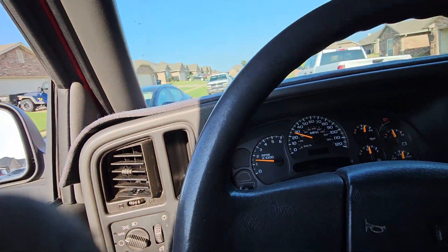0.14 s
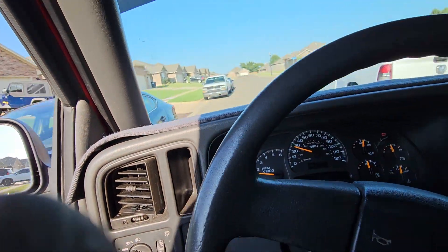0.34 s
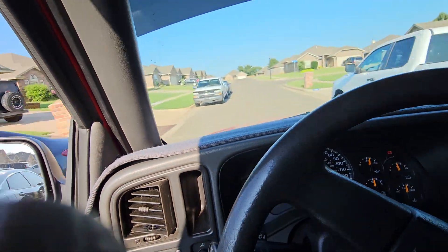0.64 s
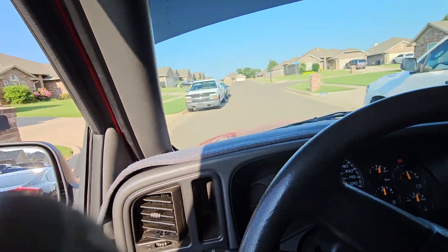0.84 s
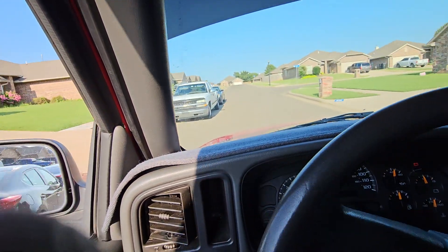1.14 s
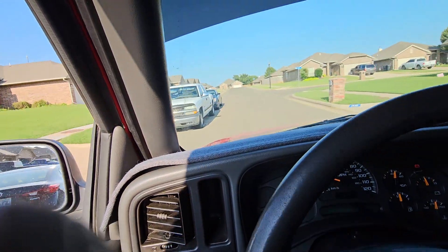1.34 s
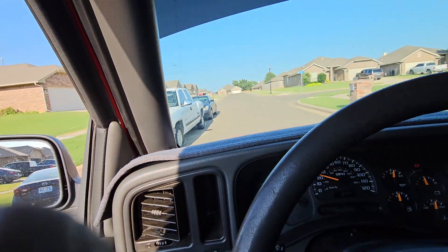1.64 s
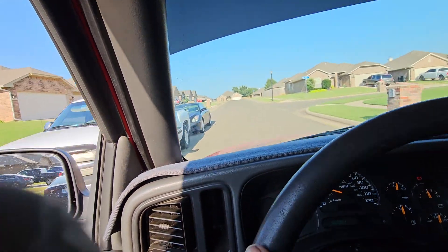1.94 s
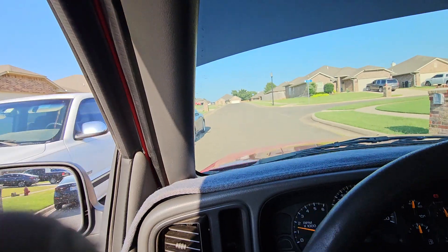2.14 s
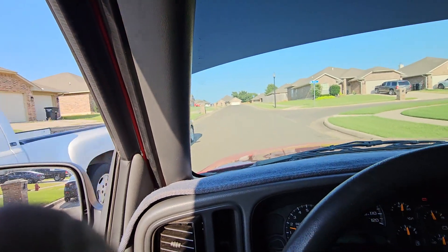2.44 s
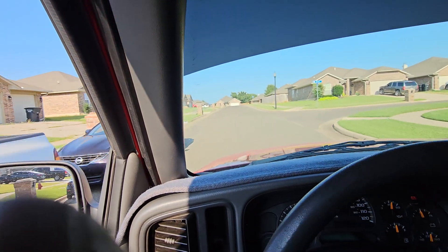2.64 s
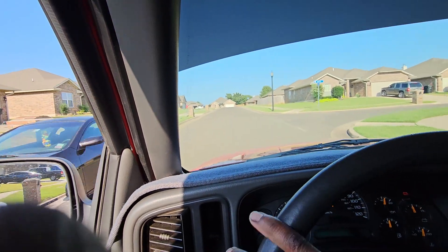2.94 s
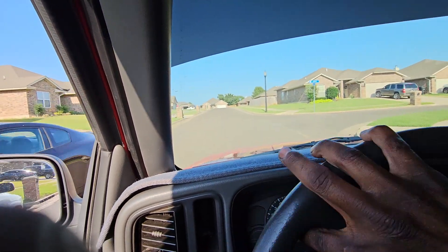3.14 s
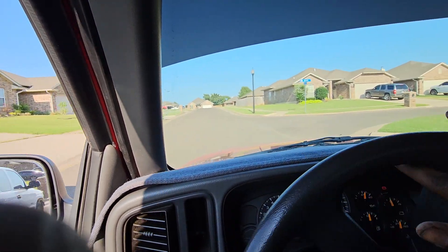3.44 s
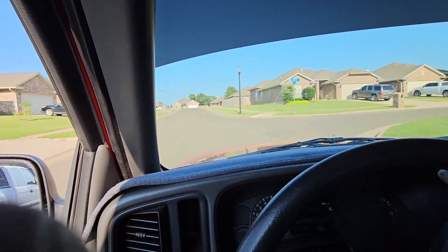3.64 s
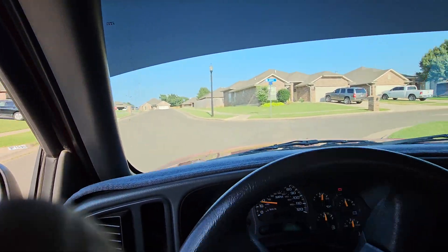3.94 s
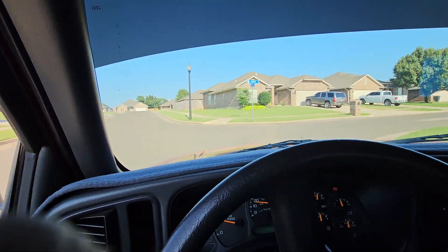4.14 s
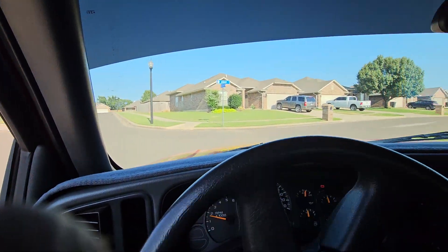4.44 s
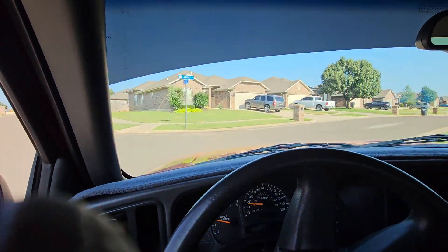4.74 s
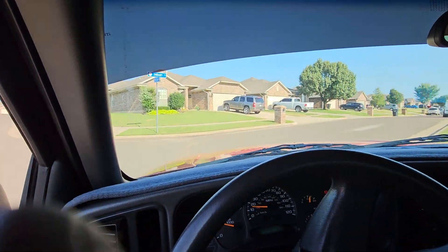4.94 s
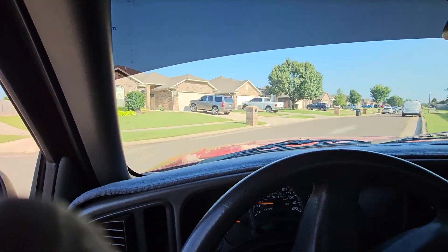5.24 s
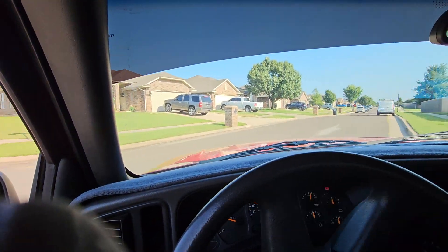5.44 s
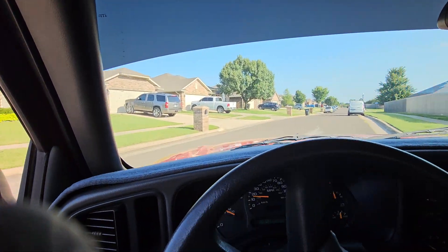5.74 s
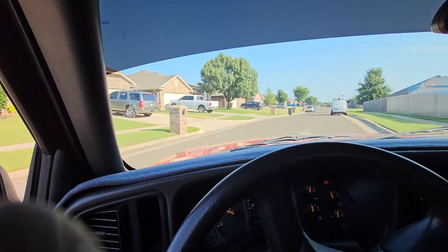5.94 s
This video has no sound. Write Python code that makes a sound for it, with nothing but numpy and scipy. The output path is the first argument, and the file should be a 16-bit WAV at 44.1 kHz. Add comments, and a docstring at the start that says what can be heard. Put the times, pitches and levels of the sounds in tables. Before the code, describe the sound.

A rough V8 pickup rumbles along slowly, heard inside the cab with wind buffeting and trim rattling, then revs up.

```python
"""A V8 pickup rolls along a street and revs up at the end, heard in the cab with the driver's window down.
The engine's firings make the exhaust drone and burble, and one bank (row of cylinders) leaks in chuffs.
Chuffs, tyre swish and engine roar grow louder where parked cars throw them back. Gusts buffet the cab,
intake air hisses, something squeaks faintly, loose trim rattles on bumps and a hand slides on the wheel."""
import sys
import numpy as np
from scipy import signal
from scipy.fft import rfft, irfft
from scipy.io import wavfile
from scipy.ndimage import uniform_filter1d

SR = 44100
rng = np.random.default_rng(int(sys.argv[2]) if len(sys.argv) > 2 else 0)


def generate_wav(sig):
    """Save sig (samples, or channels by samples) to the path in sys.argv[1] as 16-bit PCM at SR."""
    pcm = np.round(np.clip(np.atleast_2d(sig).T, -1, 1) * 32767).astype(np.int16)
    wavfile.write(sys.argv[1], SR, pcm)


N = 269010
TIME = np.arange(N) / SR
FREQS = np.fft.rfftfreq(N, 1 / SR)

# engine speed (time [s], firings per second [Hz])
FIRING_RATE = [(0.0, 75.7), (0.36, 74.5), (0.64, 71.2), (0.9, 71.9), (1.2, 76.9), (1.6, 76.6), (1.92, 74.8),
               (2.68, 84.4), (3.16, 79.9), (3.42, 75.0), (3.96, 81.5), (4.2, 86.1), (4.42, 85.0),
               (4.98, 86.1), (5.72, 119.4), (6.1, 122.1)]
# how much louder the window side is (frequency [Hz], left minus right [dB])
WINDOW_SIDE = [(50, 1), (80, -0.3), (125, 1.5), (300, 2.5), (700, 3.5), (1300, 5), (2500, 6), (4500, 10.5),
               (7500, 10), (9500, 9), (12000, 2), (15000, 15.5)]
# knocks of trim and body over bumps (time [s], level [dB], hardness as extra treble [dB])
BUMP_KNOCKS = [(.247, -36, -24), (.563, -36, -13), (2.705, -35.5, -13), (3.371, -36, -12),
               (3.407, -29, -19), (3.448, -36, -17), (3.482, -37, -12), (3.826, -39.5, 2),
               (3.851, -40.5, -6), (3.891, -32, -9), (3.99, -37, -17), (4.014, -35, 1.5), (4.023, -38, -11),
               (4.073, -30, 7), (4.123, -30, -5), (4.155, -33.5, 7.5), (4.168, -37, 0), (4.202, -51.5, 10),
               (4.255, -34, -4.5), (4.284, -47, 15), (4.757, -58, 16)]


def amp(db):
    """Turns decibels into a gain to multiply by."""
    return 10 ** (np.asarray(db) / 20)


def unit_level(x):
    """Scales a signal to an average (rms) level of 1."""
    return x / np.sqrt(np.mean(x ** 2) + 1e-20)


def over_time(rows):
    """Joins (time, value) points into one value per sample."""
    return np.interp(TIME, *np.transpose(rows))


def over_freqs(rows):
    """Joins (frequency, value) points along a logarithmic frequency axis."""
    hz, value = np.transpose(rows)
    return np.interp(np.log(FREQS + 1), np.log(hz + 1), value)


def noise():
    """Two channels of white noise."""
    return rng.standard_normal((2, N))


def colour(x, spectrum):
    """Filters a signal by a (frequency, dB) table and scales it to level 1."""
    return unit_level(irfft(rfft(x) * amp(over_freqs(spectrum)), N))


def wander(rate_hz):
    """A smooth random wobble of level 1, mostly slower than rate_hz."""
    hz = FREQS[FREQS < 3 * rate_hz]
    slow_part = rfft(rng.standard_normal(N))[:len(hz)]
    return unit_level(irfft(slow_part * np.exp(-(hz / rate_hz) ** 2), N))


def add(mix, start_s, sound):
    """Mixes a sound in at its start time."""
    part = mix[:, round(start_s * SR):][:, :sound.shape[1]]
    part += sound[:, :part.shape[1]]


def swells(rows, floor_db=-120):
    """A gain that rises in bell-shaped swells above a floor; their powers add."""
    t = TIME[::32]
    power = sum(amp(db) ** 2 * np.exp(-((t - peak_s) / half_s) ** 2) for peak_s, db, half_s in rows)
    return np.sqrt(amp(floor_db) ** 2 + np.interp(TIME, t, power))


def revs():
    """Engine speed in octaves (doublings) above its starting speed."""
    return np.log2(over_time(FIRING_RATE) / FIRING_RATE[0][1])


def throttle(smooth_s=0.41):
    """How fast the revs climb, in octaves per second; zero when coasting."""
    climb = np.maximum(np.gradient(revs()) * SR, 0)
    return uniform_filter1d(climb, round(smooth_s * SR))


def in_cab(two_noises, spectrum):
    """Filters two noises into cab sound: bass alike in both ears, treble spread out and from the left."""
    # how alike the two ears hear it (frequency [Hz], likeness [0 to 1])
    likeness = [(60, 1), (100, 0.99), (140, 1), (290, 0.88), (640, 0.51), (1400, 0.77), (3000, 0.086),
                (8000, 0.14)]
    first, second = rfft(two_noises) * amp(over_freqs(spectrum))
    alike = np.clip(over_freqs(likeness), -1, 1)
    mid, side = first * np.sqrt(1 + alike), second * np.sqrt(1 - alike)
    lean = amp(over_freqs(WINDOW_SIDE) / 2)
    pair = irfft(np.array([(mid + side) * lean, (mid - side) / lean]), N)
    return pair / np.std(pair.mean(0))


def exhaust_drone(firings, firing_waver_db=1.0, other_waver_db=2.0, slip_radians=0.15):
    """Engine tones sweep through the cab's resonances; uneven cylinder banks give the odd ones."""
    # exhaust tones (multiple of the eight-firing cycle [count], relative level [dB])
    tones = [(3, -12.5), (5, -16), (7, -16), (8, 1.5), (10, -12.5), (11, -9.5), (13, -12.5), (16, -9),
             (19, -15), (21, -18.5), (24, -19), (27, -21.5), (29, -19.5), (32, -36), (37, -25.5)]
    # how the cab passes them, booming near 200 Hz (frequency [Hz], gain [dB])
    cab_response = [(40, 6.5), (72, 0.5), (80, 0.5), (125, 2.5), (150, 1), (168, 1.5), (184, -4), (197, 9),
                    (207, -2), (240, -7), (285, -4), (350, -4.5), (480, -16), (560, 2), (650, -12)]
    # loudness of the whole drone (time [s], level [dB])
    loudness = [(0.3, -24.6), (1.0, -26.5), (2.2, -27), (4.2, -26.5), (5.3, -28.5), (5.9, -24)]
    dip_hz, dip_width_hz, dip_db = 95, 6.1, -2  # the driver sits in a quiet spot for this pitch
    cab_db = over_freqs(cab_response) + dip_db * np.exp(-((FREQS - dip_hz) / dip_width_hz) ** 2)
    cycle_hz = over_time(FIRING_RATE) / 8
    out = np.zeros(N)
    for multiple, db in tones:
        is_firing_tone = multiple == 8
        turns = multiple * firings / 8 + (0 if is_firing_tone else rng.random())
        waver_db = wander(5.7) * (firing_waver_db if is_firing_tone else other_waver_db)
        gain = amp(db + np.interp(multiple * cycle_hz, FREQS, cab_db) + waver_db)
        slip = 0 if is_firing_tone else slip_radians * wander(9.8)
        out += gain * np.cos(2 * np.pi * turns + slip)
    lean = amp(over_freqs(WINDOW_SIDE) / 2)
    pair = irfft(rfft(unit_level(out)) * np.array([lean, 1 / lean]), N)
    return pair * amp(over_time(loudness))


def exhaust_burble(firings, firing_hz, boost_db=7.5, steady=0.46, rise_s=0.0012, decay_s=0.0067):
    """Each firing blows a ragged puff down the pipe."""
    # rumble of uneven burning (frequency [Hz], relative level [dB])
    spectrum = [(30, -35), (60, 9), (110, -2.5), (150, -2.5), (200, 0.5), (280, -4), (340, -15.5),
                (450, -20), (700, -19), (1500, -53)]
    # swells under load (peak time [s], level before the boost [dB], half-length [s])
    surges = [(0.28, -43, 0.11), (0.65, -47.5, 0.26), (2.8, -42.5, 0.34), (3.7, -45, 0.3),
              (4.72, -37, 0.054), (5.21, -38, 0.03)]
    since_firing_s = firings % 1 / firing_hz
    puffs = steady + (1 - np.exp(-since_firing_s / rise_s)) * np.exp(-since_firing_s / decay_s)
    gain = swells(surges, floor_db=-43.5 + 1.5 * revs()) * amp(boost_db)
    return in_cab(noise() * puffs, spectrum) * gain


def air_buffet(evening_out=0.38, breeze_db=-27.5):
    """Gusts at the open window and jolts from the road pump the air of the whole cab."""
    # the deep flutter of the air (frequency [Hz], relative level [dB])
    spectrum = [(8, -54), (18, -7), (23, -2.5), (29, 5.5), (42, -6), (52, -6), (70, -21.5), (130, -25.5),
                (400, -75)]
    # gusts and jolts (peak time [s], level [dB], half-length [s])
    gusts = [(0.08, -21.5, 0.049), (0.3, -11.5, 0.019), (0.43, -17.5, 0.093), (0.57, -14.5, 0.022),
             (0.74, -18.5, 0.057), (1.15, -28.5, 0.18), (1.48, -21, 0.05), (2.89, -22.5, 0.097),
             (3.39, -13.5, 0.041), (3.55, -20, 0.046), (3.74, -24.5, 0.066), (4.0, -14.5, 0.068),
             (4.56, -32, 0.3), (4.84, -15.5, 0.028), (4.96, -15, 0.04), (5.17, -25, 0.067),
             (5.35, -21.5, 0.019)]
    swing = signal.hilbert(colour(rng.standard_normal(N), spectrum))
    swing_size = np.sqrt(uniform_filter1d(abs(swing) ** 2, size=2500))
    return unit_level(swing.real / swing_size ** evening_out) * swells(gusts, breeze_db)


def parked_car_gain(source, direct_db, lag_s=0, spread=1, falloff=1.28):
    """Gain of an outside sound: its direct part plus what each parked car throws back."""
    # parked cars (time alongside [s], half-length [s], chuff echo [dB], tyre echo [dB], engine echo [dB])
    parked_cars = [(0.1, 0.19, -47.5, -48, -42.5), (0.685, 0.18, -45, -44, -39),
                   (1.157, .15, -56.5, -51.5, -45.5), (2.533, 0.19, -46.5, -44, -44.5),
                   (2.88, 0.37, -52.5, -49, -48.5), (3.488, 0.17, -49.5, -46, -54),
                   (3.867, .12, -53.5, -57, -49)]
    column = ("chuffs", "tyres", "engine").index(source)
    t, power = TIME[::32], 0
    for alongside_s, half_s, *echo_db in parked_cars:
        distance = (t - lag_s - alongside_s) / (half_s * spread)
        power = power + amp(echo_db[column]) ** 2 / (1 + distance ** 2 / 2) ** (2 * falloff)
    return np.sqrt(amp(direct_db) ** 2 + np.interp(TIME, t, power))


def leak_chuffs(firings, idle_db=-66.5, rise_s=0.0024, decay_s=0.0095, steady=0.17, patchy_db=5.0):
    """One bank leaks gas in a limping rhythm, harder under throttle; each jet has its own hiss."""
    # the leaking cylinders (place in the eight-firing cycle [firings], relative level [dB])
    cylinders = [(0, 0), (1, -8), (3, -1), (6, -4)]
    # hiss of the escaping gas (frequency [Hz], relative level [dB])
    spectrum = [(500, -15.5), (1200, 9.5), (2500, -2), (4000, -13), (5300, 5), (6500, 1.5), (7500, -0.5),
                (8500, 2.5), (10300, 2), (11800, 6.5), (13000, -2), (14300, -7), (16000, -14)]
    start_place = 0.62  # where in the firing cycle the limping chuff rhythm starts [firings]
    t = np.arange(3072) / SR
    shape = (1 - np.exp(-t / rise_s)) * np.exp(-t / decay_s)
    jets = steady * noise()
    for place, db in cylinders:
        cycle = np.floor((firings - place + start_place) / 8)
        for start in np.flatnonzero(np.diff(cycle)):
            patches = unit_level(uniform_filter1d(rng.standard_normal(len(t) // 2 + 1), size=45))
            jet = irfft(rfft(rng.standard_normal((2, len(t)))) * amp(patchy_db * patches))
            add(jets, start / SR, unit_level(jet) * shape * amp(db))
    direct_db = idle_db + 10 * revs() + 5 * throttle()
    return in_cab(jets, spectrum) * parked_car_gain("chuffs", direct_db)


def tyre_swish(idle_db=-59, db_per_octave=6, flutter_db=1.0):
    """Tyres swish on the road, louder with speed and beside parked cars."""
    # the swish (frequency [Hz], relative level [dB])
    spectrum = [(500, -9), (1050, 0.5), (1400, 2), (1750, -1.5), (2250, 1), (3200, -5), (4800, -4.5),
                (6500, -15), (9000, -14), (11700, -37), (16000, -33)]
    swish = in_cab(noise() * amp(flutter_db * wander(27)), spectrum)
    return swish * parked_car_gain("tyres", idle_db + db_per_octave * revs(), lag_s=0.015, spread=0.94)


def engine_roar(firings, idle_db=-48, db_per_octave=3, throb=0.24):
    """The engine bay's roar throbs with the firings, louder with speed and beside parked cars."""
    # the roar (frequency [Hz], relative level [dB])
    spectrum = [(150, -47), (350, -1), (450, 0.5), (550, 4), (650, -2), (780, 1), (980, -4), (1250, -3.5),
                (1700, -10.5), (2200, -15.5), (3200, -24.5), (6000, -42), (16000, -57)]
    roar = in_cab(noise() * (1 + throb * np.cos(2 * np.pi * firings)), spectrum)
    return roar * parked_car_gain("engine", idle_db + db_per_octave * revs(), lag_s=0.015, spread=1.16)


def intake_hiss(idle_db=-66, db_per_octave=12):
    """Air drawn into the engine hisses more as the revs climb."""
    # the rushing air (frequency [Hz], relative level [dB])
    spectrum = [(1000, 0), (2500, 7.5), (5000, -3), (8000, -6), (10000, 0), (11700, 7), (14000, -2),
                (16000, -28)]
    return in_cab(noise(), spectrum) * amp(idle_db + db_per_octave * revs())


def squeaks(waver=0.022, right_db=-9):
    """Brief thin chirps of wavering pitch on the window side."""
    # the chirps (start [s], pitch [Hz], relative level [dB], length [s])
    chirps = [(0.16, 5320, -50, 0.05), (0.373, 5200, -57, 0.057), (0.666, 8300, -45, 0.036),
              (0.741, 6200, -53, .018), (2.204, 5200, -51.5, 0.028), (2.606, 5400, -51, .018),
              (4.011, 4580, -42.5, 0.012)]
    out = np.zeros((2, N))
    for start_s, hz, db, length_s in chirps:
        count = round(length_s * SR)
        turns = np.cumsum(hz * (1 + waver * wander(300)[:count])) / SR
        chirp = amp(db) * np.hanning(count) * np.sin(2 * np.pi * turns)
        add(out, start_s, 2 * chirp * amp([[0], [right_db]]))
    return out


def trim_rattle(ring_db=-5, clatter_db=-2.5, snap_db=-2, clatter_fade_s=0.11, snap_fade_s=0.048,
                rise_s=0.0014, vary_db=2, detune=0.022, hard_hz=3000):
    """Loose trim snaps, clatters around the cab and rings; soft blows ring mainly its low tones."""
    # the panel's own tones (pitch [Hz], relative level [dB], time to fade by 60 dB [s])
    panel_tones = [(453, -0.5, 0.17), (520, 12, 0.068), (754, 3, 0.052), (1054, 2, 0.054), (1677, 2, 0.051),
                   (2150, 4, 0.049), (2730, -22, 0.035), (3330, -5.5, 0.028)]
    # the dull clatter (frequency [Hz], relative level [dB])
    clatter_spectrum = [(200, -5), (480, 5), (800, 10), (1400, -3.5), (2300, -5), (3500, -8.5), (6000, -26),
                        (16000, -48)]
    # the bright snap (frequency [Hz], relative level [dB])
    snap_spectrum = [(800, -9), (2200, 6), (4200, 1), (6500, -3), (9000, -10.5), (12000, -12), (16000, -32)]
    out, t = np.zeros((2, N)), np.arange(SR // 5) / SR
    clatter_noise, snap_noise = colour(noise(), clatter_spectrum), colour(noise(), snap_spectrum)
    attack = 1 - np.exp(-t / rise_s)
    for start_s, db, treble_db in BUMP_KNOCKS:
        ring = 0
        for hz, tone_db, fade_s in panel_tones:
            struck_db = tone_db + treble_db * min(hz / hard_hz, 1) + vary_db * rng.standard_normal()
            turns = hz * (1 + detune * rng.standard_normal()) * t + rng.random()
            ear_shift = rng.random((2, 1)) * min(hz / 1500, 1)  # low tones reach both ears more alike
            ring = ring + amp(struck_db - 60 * t / fade_s) * np.sin(2 * np.pi * (turns + ear_shift))
        here = slice(round(start_s * SR), round(start_s * SR) + len(t))
        clatter = clatter_noise[:, here] * amp(clatter_db - 60 * t / clatter_fade_s)
        snap = snap_noise[:, here] * amp(snap_db + treble_db - 60 * t / snap_fade_s)
        add(out, start_s, amp(db) * attack * (amp(ring_db) * ring + clatter + snap))
    return out


def body_thuds(offset_db=-4, rise_s=0.011, fade_s=0.12, low_hz=140, high_hz=380):
    """Every knock also shakes the truck's body: a dull thud, alike in both ears."""
    band = [(low_hz / 2, -30), (low_hz, 0), (high_hz, 0), (high_hz * 2, -30)]
    shake = colour(rng.standard_normal(N), band)
    power, t = np.zeros((1, N)), np.arange(0, fade_s, 1 / SR)
    shape = (1 - np.exp(-t / rise_s)) * amp(-60 * t / fade_s)
    for start_s, db, _ in BUMP_KNOCKS:
        add(power, start_s, (amp(db + offset_db) * shape[None]) ** 2)
    return shake * np.sqrt(power)


def hand_slide():
    """A palm rubs over the steering wheel's rim with a short hiss."""
    # the rubbing (frequency [Hz], relative level [dB])
    spectrum = [(2000, 0), (5000, 2), (8000, -1), (11500, 1), (15500, -4)]
    # the hand's stroke (peak time [s], level [dB], half-length [s])
    stroke = [(1.52, -51.5, .12)]
    return colour(noise(), spectrum) * swells(stroke)


def cab_echoes(pair, strength=0.43, count=20):
    """Glass and dashboard add short echoes that colour the treble, differently in each ear."""
    delays_s = rng.uniform(0.001, 0.014, (2, count))
    taps = np.array([np.bincount((ear * SR).astype(int), minlength=N) for ear in delays_s])
    echoes = rfft(taps / np.sqrt(count))
    share = strength * FREQS / (FREQS + 700)  # long waves wrap round the small surfaces
    return irfft(rfft(pair) * (1 + share * echoes) / np.sqrt(1 + share ** 2), N)


def scene():
    """One count of firings times the engine's sounds; sound from the window reaches the right ear later."""
    # how far the right ear lags (frequency [Hz], phase lag [radians])
    right_lag = [(5, 0), (30, .1), (80, .12), (130, .24), (340, .6), (600, 1.3), (1200, 3), (1900, 5.2),
                 (4000, 11), (8000, 21)]
    firing_hz = over_time(FIRING_RATE)
    firings = np.cumsum(firing_hz) / SR
    deep = exhaust_drone(firings) + exhaust_burble(firings, firing_hz) + air_buffet()
    bright = leak_chuffs(firings) + tyre_swish() + engine_roar(firings) + intake_hiss() + hand_slide()
    left, right = deep + cab_echoes(bright)
    right = irfft(rfft(right) * np.exp(-1j * over_freqs(right_lag)), N)
    return np.array([left, right]) + squeaks() + trim_rattle() + body_thuds()


def record(dry, cutoff_hz=15800):
    """Cuts away the very highest treble."""
    low_pass = signal.firwin(511, cutoff_hz, window=("kaiser", 9), fs=SR)
    return signal.oaconvolve(dry, low_pass[None], "same")


dry = scene()
out = record(dry)
generate_wav(out)
```